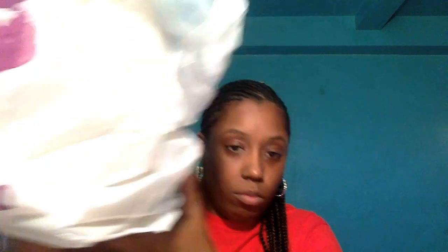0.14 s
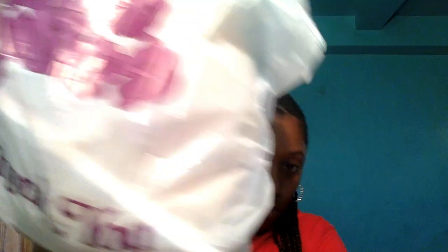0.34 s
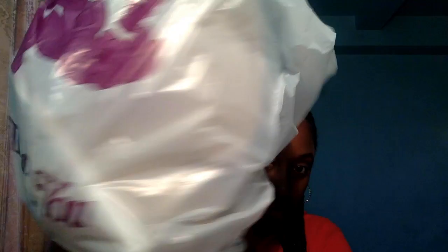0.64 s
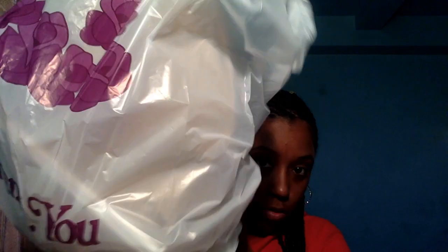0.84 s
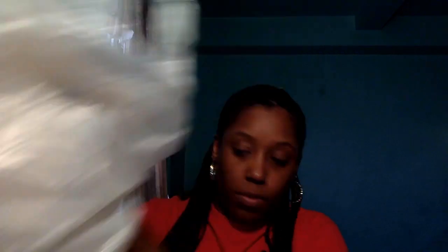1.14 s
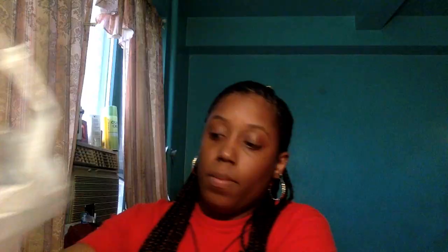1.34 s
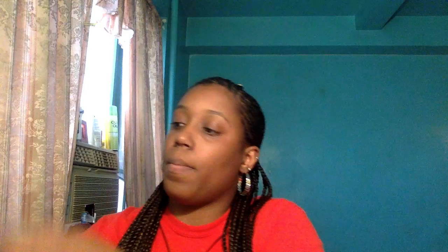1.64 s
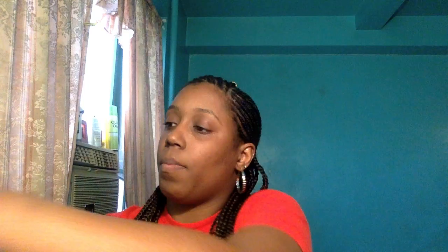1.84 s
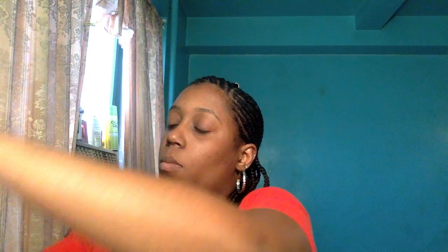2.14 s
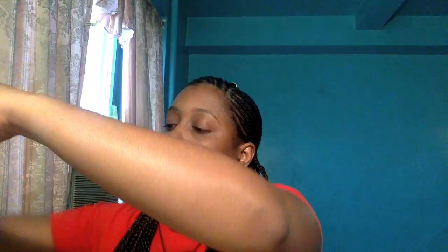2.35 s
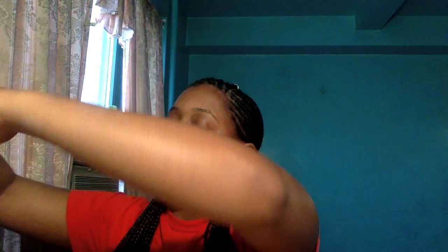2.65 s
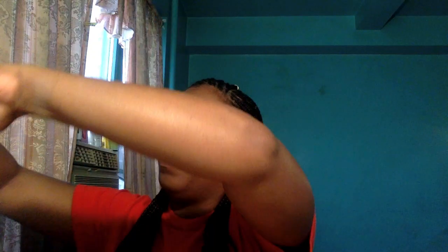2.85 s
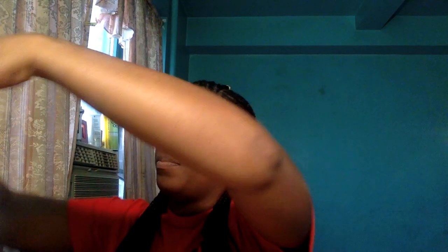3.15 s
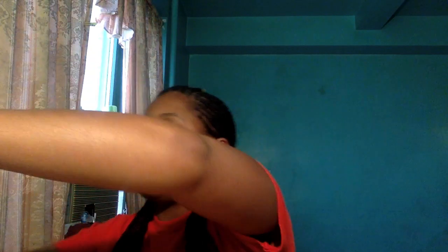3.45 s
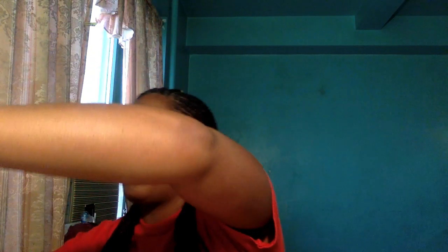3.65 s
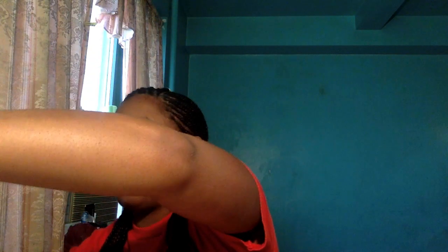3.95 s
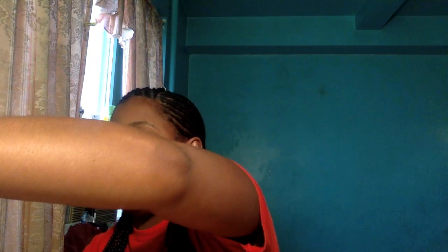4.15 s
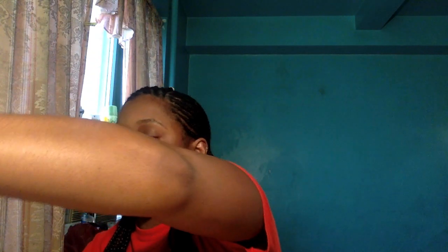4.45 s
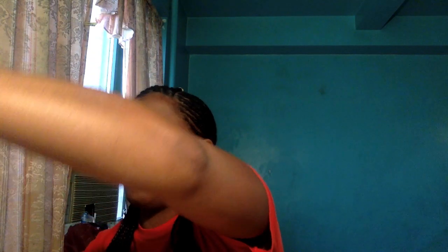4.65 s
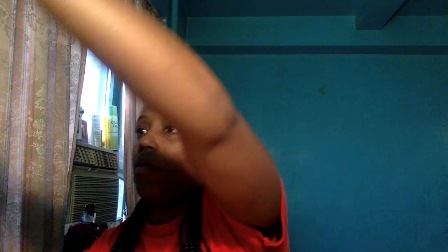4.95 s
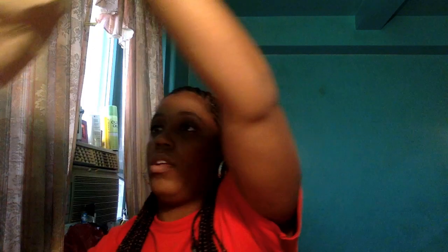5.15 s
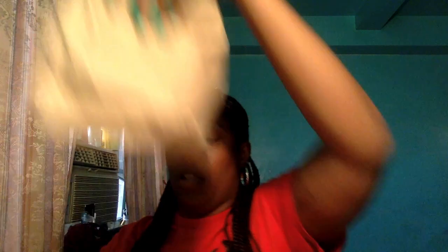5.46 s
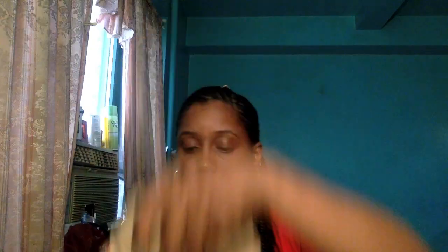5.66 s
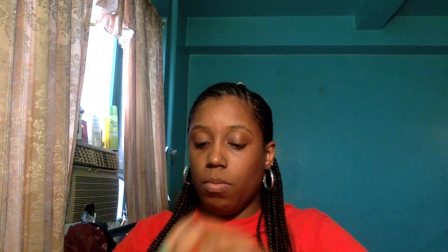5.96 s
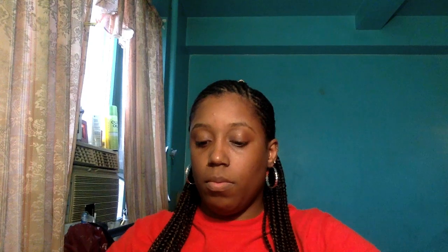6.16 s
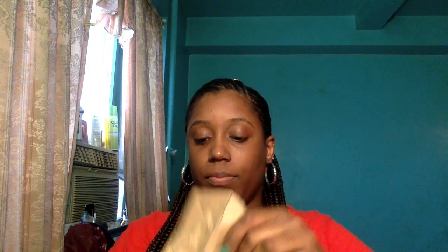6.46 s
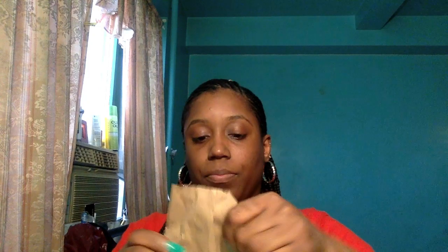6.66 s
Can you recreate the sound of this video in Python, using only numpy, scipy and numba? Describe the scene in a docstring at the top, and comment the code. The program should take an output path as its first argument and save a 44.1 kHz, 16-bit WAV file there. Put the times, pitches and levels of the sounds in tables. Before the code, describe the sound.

Hands rummage in a thin plastic carrier bag with sharp irregular crackles, pause briefly, then crumple a stiff paper bag close by in a small room.

```python
"""Rummaging in carrier and paper bags

Hands rummage in a thin plastic carrier bag and pull out a stiff paper bag, near a laptop in a small room.
Creases, folds and film crackle as many short decaying tones, clustered by a wandering grip; snaps, ticks,
pops and bumps come at listed times. Air in the bags booms, something small clinks twice, and two faint
hollow tones ring. A fan hums faintly as shaped noise. The microphone peaks at 3 kHz and dips near 7.5 kHz.
"""
import sys
import numpy as np
from scipy import signal
from scipy.fft import rfft, irfft
from scipy.io import wavfile
from numba import njit

SR = 44100
rng = np.random.default_rng(int(sys.argv[2]) if len(sys.argv) > 2 else 0)


def wrap_up_sound(samples):
    """Save the sound to the file named by the first command line argument, as 16-bit audio."""
    columns = np.atleast_2d(samples).T
    # keep every value between -1 and 1, then stretch to whole-number steps
    tamed = np.clip(columns, -1, 1)
    steps = np.round(tamed * 32767).astype(np.int16)
    wavfile.write(sys.argv[1], SR, steps)


N = 300762  # length in samples

# Levels below are starting values: the sound functions add fixed offsets, then come room and microphone.
# Faint fan noise, as it leaves the microphone: pitch_hz, level_db (per Hz, only the shape matters)
FAN_SPECTRUM = [(24, -65.5), (40, -35.5), (124, -8), (155, -17.5), (402, -17), (715, -27), (873, -21),
                (1300, -46), (2840, -28.5), (6020, -39.5), (16000, -46.5)]
FAN_RMS_DB = -63.5
# Each squeeze or pull of a bag: full_from_s, build_up_s, hold_s, crease_db, crease_pitch_hz,
# fold_db (relative to creases), fine_crackle_db (relative to creases)
SQUEEZES = [(.0, 0.018, 0.0075, -47, 3050, -8, 1), (0.077, 0.036, 0.014, -51.5, 2640, -4.5, 9),
            (0.191, 0.0087, 0.0049, -35, 2940, -16, 3), (0.303, 0.036, 0.016, -63, 2020, -20, -5),
            (0.49, 0.16, 0.032, -56.5, 3300, -0.5, -2), (0.633, 0.21, 0.19, -49, 3210, -18, 6.5),
            (0.751, 0.05, 0.032, -43.5, 2870, -13, 9), (0.797, 0.024, 0.018, -47, 2580, -5, -3),
            (0.88, .04, 0.041, -66, 2620, -7, 10), (0.957, 0.082, 0.029, -56.5, 2620, -1.5, 3),
            (1.03, .03, .02, -74, 3000, -8, 2), (1.077, 0.023, 0.078, -60, 3960, -17, 1),
            (1.28, 0.096, 0.061, -38, 2960, -5, 2), (1.455, 0.14, 0.1, -37, 2890, -5.5, 4.5),
            (1.625, 0.17, 0.032, -23.5, 3436, -4.5, 2.5), (1.83, 0.74, 0.098, -38.5, 2750, -8.5, -12),
            (1.909, 0.024, 0.042, -20.5, 3290, -8.5, -2.5), (2.045, 0.21, 0.04, -24, 2980, -6, -1),
            (2.144, 0.16, 0.2, -25.5, 3270, -7.5, 1), (2.389, 0.022, 0.011, -33, 3200, -11, -14),
            (2.473, 0.021, 0.058, -24.5, 3350, -5, 2.5), (2.551, .05, 0.086, -30, 2890, -9, -5.5),
            (2.746, 0.12, 0.026, -29.5, 2790, -4, -14), (2.776, 0.014, 0.21, -24.5, 3110, -5, 0.5),
            (3.085, .015, 0.008, -41.5, 3300, -3, -14), (3.132, 0.016, 0.07, -34.5, 3110, 0, -15),
            (3.251, 0.015, 0.032, -38.5, 2940, 4.5, -7), (3.344, 0.024, 0.073, -30, 2900, -8.5, -5),
            (3.414, 0.15, 0.11, -34.5, 2770, -1, -1), (3.565, 0.036, 0.057, -46.5, 4020, -16, 7),
            (3.628, 0.022, 0.015, -33.5, 2700, 0, -6), (3.71, 0.012, 0.096, -29, 2860, -5, -11.5),
            (3.84, .03, .02, -38.5, 3650, -5, -2.5), (3.923, 0.064, 0.063, -28, 2690, -2, -8.5),
            (4.065, 0.023, 0.12, -36, 2100, -2.5, -5.5), (4.175, 0.073, 0.07, -29.5, 2410, -3.5, -5.5),
            (4.26, 0.026, 0.048, -39.5, 2330, 1, 0.5), (4.326, 0.045, 0.027, -45.5, 2410, 1, -12),
            (4.4, 0.27, 0.12, -44.5, 3160, 1, -7.5), (4.581, 0.24, 0.05, -33.5, 2760, -2.5, -5),
            (4.59, 0.066, 0.48, -50.5, 2960, -14.5, 19), (4.643, 0.018, 0.018, -26, 3000, -2, 0.5),
            (4.739, 0.056, 0.086, -28.5, 2720, -4, 6), (4.872, 0.099, 0.13, -35.5, 3420, 2, 10),
            (5.032, .05, 0.09, -40, 3660, -5.5, 2), (5.173, .03, 0.22, -62.5, 2940, -1, -14),
            (5.355, 0.04, 0.03, -51, 2210, -8, -1.5), (5.428, 0.03, 0.069, -66, 3090, -15, 1.5),
            (5.725, 0.003, 0.0057, -37, 3230, -31, -8), (5.817, .012, 0.028, -43.5, 3570, -5, -22),
            (5.85, 0.016, 0.018, -18.5, 2965, -8, 3), (5.9, .02, 0.071, -38, 3180, -10, -1),
            (5.998, 0.1, 0.063, -33, 3630, -5.5, -3.5), (6.168, 0.13, 0.052, -21, 3570, -12, -1.5),
            (6.247, 0.099, 0.13, -25.5, 3340, -9.5, 0), (6.453, 0.23, 0.13, -21, 3430, -13.5, -1.5),
            (6.59, 0.032, 0.092, -32, 3790, -11, 0), (6.697, 0.033, .03, -34.5, 3440, -9.5, -15),
            (6.775, 0.075, 0.1, -19, 3490, -11, -1)]
# Bags settling between squeezes: crease_db, crease_pitch_hz, fold_db and fine_crackle_db (relative to creases)
BAGS_AT_REST = (-68.5, 3008.5, -6, -8.5)
# How much air booms in the bags: time_s, boom_db (relative to broad folds)
AIR_BOOM = [(0, 3), (1.2, -21), (1.4, -7.5), (1.6, -4.5), (2.3, -7), (2.6, -4.5), (2.9, -4), (3.1, -7.5),
            (4.3, -12.5), (4.9, -8), (5.3, -2.5), (5.7, -5.5), (6.0, -1.5), (6.82, 3.5)]
# Hollow tones of the air and the desk: pitch_hz, level_db, t60_s (time to fall by 60 dB)
HOLLOW_MODES = [(87.7, -5.5, 0.1), (126.4, -5, 0.18), (224, -3.5, 0.06), (291, 5.5, 0.032),
                (354, 0.5, 0.04), (541, -0.5, 0.051)]
# Crease snaps and film ticks, loud and faint: start_s, level_db, pitch_hz,
# tick_db (bright tick, relative to the snap)
CREASE_SNAPS = [(0.0151, -22, 2980, -24), (0.093, -35, 2530, 6), (0.177, -35, 2460, 4),
                (0.197, -17, 2980, -0.5), (0.205, -17.5, 5300, -7), (0.3075, -41, 2110, -20.0),
                (0.3168, -36, 2110, -18), (0.595, -29.5, 2220, -19.0), (0.6246, -31, 3660, -15),
                (0.6462, -31, 2740, 12.5), (0.685, -43, 2800, 23), (0.701, -43, 2780, 21),
                (0.7351, -31, 2580.0, 10), (0.7615, -29, 2600, 8), (0.7976, -15.5, 2870, -15.0),
                (0.822, -25.5, 2140, -12.0), (0.936, -35, 1860, -15), (0.97, -43.0, 2660, 12),
                (0.9867, -33.5, 6040.0, 7.5), (1.0403, -51, 4970.0, 17), (1.0926, -31.5, 4540, 8.5),
                (1.1352, -50, 4610.0, 14), (1.1851, -52.0, 3470.0, 10), (1.2245, -48, 2630.0, 11),
                (1.257, -29, 2580, 5), (1.278, -31.5, 2900, 10), (1.305, -14.5, 2730.0, -12),
                (1.3195, -20.5, 3160, -2), (1.328, -31.0, 2960, 6), (1.4092, -29, 2930.0, 6),
                (1.4496, -36.0, 3370.0, 7), (1.462, -24, 3200, -5.0), (1.511, -20, 1830, -10),
                (1.537, -18, 3080, -1), (1.6197, -13, 1560, -8.0), (1.6421, -9.5, 3180, -7.0),
                (1.817, -28, 3120, 1), (1.8248, -25, 3010.0, -5), (1.857, -21, 3000, -14.0),
                (1.887, -21, 3480.0, -32.0), (1.8965, -16.5, 1560.0, -12), (1.9133, -10, 2880, 6),
                (1.933, -7, 2710, 7.5), (1.949, -14, 3160, 3), (1.994, -17.5, 1790, 6),
                (2.032, -19, 2360.0, -8), (2.0674, -9.5, 3030, -2.5), (2.076, -10.5, 2460, -2),
                (2.112, -13.5, 2580, 0), (2.1233, -13, 3350, 0), (2.1472, -11, 4830, -15),
                (2.158, -11.5, 3060, 1.5), (2.1725, -9, 2260, -15), (2.1882, -8.5, 4100, -2),
                (2.2012, -19, 2830.0, 15), (2.2232, -6, 4830, -3), (2.234, -10.5, 2830.0, -1),
                (2.2795, -6.5, 3470, -2), (2.3176, -8.5, 3660, 2.5), (2.357, -13.5, 2700, -20),
                (2.464, -14, 3130.0, -16), (2.4716, -25, 2930.0, -5.0), (2.4804, -4, 3260, -3),
                (2.5092, -13, 2600, 7), (2.5145, -5, 3000, -5), (2.569, 0, 2860, -3.5),
                (2.5754, -25, 3370.0, 3), (2.6385, -8.5, 2980, -28), (2.6494, -6, 4000, -7),
                (2.659, -31, 5060.0, 1), (2.696, -19, 3180, -31), (2.7316, -14.5, 3380, -23.0),
                (2.7655, -4, 2640, -2.5), (2.7715, -5.5, 2970, -5), (2.8, -6, 3340, -3),
                (2.814, -9, 2920, 2), (2.829, -10.5, 3300, 2), (2.839, -6, 3660, -4.0),
                (2.884, -12.0, 4520, -4), (2.897, -15, 2880, -9.5), (2.909, -15, 2610, 7),
                (2.9371, -3, 3560, -19.0), (2.9455, -7, 3500, -1), (2.9807, -19, 3300, -12),
                (3.0078, -11.5, 3180, -1), (3.016, -28.5, 3060, 15), (3.0878, -29, 3710.0, -23),
                (3.1065, -17.5, 2840, -28.0), (3.142, -15.5, 4250, -13), (3.157, -12, 3270, -8.5),
                (3.178, -21.0, 3440, -19), (3.204, -17, 2900, -33.0), (3.246, -19, 2700, -24.0),
                (3.2504, -14.5, 2700, -3.5), (3.2683, -21.0, 3510.0, -15), (3.278, -14.5, 3350, -7),
                (3.2963, -22, 2680.0, -20.0), (3.3354, -13.5, 3280, -12.0), (3.346, -15, 2220, -18),
                (3.3719, -8, 2740, -3.5), (3.3937, -12, 3240, -4), (3.4466, -15.5, 2800, -11),
                (3.4746, -31, 3430.0, -8.0), (3.4902, -12, 3570, 2), (3.5132, -14, 3670, -9),
                (3.5644, -21, 3550, -2), (3.5769, -12.5, 4800, -2), (3.5994, -24, 1800, 15),
                (3.616, -32.5, 3000, 20), (3.632, -36, 3040, 17), (3.644, -14.5, 3340, -0.5),
                (3.7126, -13.5, 1790, -7), (3.7197, -11, 2810.0, -6), (3.74, -8, 2750, -11),
                (3.764, -25, 1160, 11), (3.77, -14, 2290.0, -12), (3.7806, -20, 3700, -8),
                (3.795, -10, 3050, -4), (3.8037, -15, 3140, -1), (3.82, -11.5, 2940, -2),
                (3.8492, -8.5, 3440, -11), (3.859, -26, 3800, -11), (3.8809, -23, 1360, -20.0),
                (3.9096, -28, 1420, -21.0), (3.9193, -10.5, 2240, -11), (3.9397, -7.5, 2160, -6.5),
                (3.9884, -12, 2840, -4.5), (4.044, -30.0, 2330.0, -22.0), (4.0556, -20.5, 1940, -5),
                (4.0824, -15, 2300, -13), (4.0943, -12, 1800, -9), (4.122, -24, 2070, -22.0),
                (4.146, -16.5, 1780, -9), (4.152, -16.5, 1630, -13), (4.2166, -10.0, 1470, 0.5),
                (4.226, -15, 3460, -11), (4.239, -19, 1820, -9), (4.3306, -24.5, 2350, -24),
                (4.4155, -28.5, 1370, -26), (4.4582, -28.5, 1410.0, -20), (4.5018, -25, 1350, -4.5),
                (4.5194, -19.5, 3570.0, -6), (4.5709, -16, 1500, -18.5), (4.6226, -22, 3320, -9.5),
                (4.6434, -9, 3170, -8), (4.6561, -16, 3300, -6.5), (4.672, -21, 4340.0, 7),
                (4.692, -21.5, 1820, -2), (4.7209, -17.5, 1360, -8.0), (4.732, -15.5, 3360.0, -12.5),
                (4.741, -16.5, 1950, -11), (4.753, -13, 2320, 1.5), (4.781, -7.5, 3170.0, 4.5),
                (4.8043, -18.5, 2300, -2.5), (4.8177, -10.5, 2870, -19.5), (4.879, -14, 1730, -14),
                (4.947, -16.5, 4870, 2), (4.992, -32, 3000, 19), (5.0008, -19.5, 1720, -1.5),
                (5.036, -13, 4530, -1.5), (5.075, -17, 3700, -1.5), (5.2517, -36, 5100, -20),
                (5.353, -29, 2040, -22), (5.6978, -37, 4420, 7), (5.7293, -25, 1920, 0),
                (5.738, -38, 2420, 3), (5.8084, -31, 3900, -9.0), (5.827, -26, 1720, -37.0),
                (5.855, -12, 2220.0, 2), (5.8661, -10, 2270, -6), (5.875, -12.5, 1810, -11),
                (5.9785, -30, 4260.0, 5), (6.0045, -9, 4360, 1), (6.0307, -17.5, 1760, -30),
                (6.05, -13, 2750, -7), (6.1108, -13, 3100, -11), (6.129, -12.5, 2420, 4),
                (6.1381, -31, 4450.0, 0), (6.1712, -12, 2920, 0), (6.1806, -7, 4500, 0.5),
                (6.207, -6, 4770, 2), (6.2133, -18, 3290.0, 5.0), (6.247, -20, 2990.0, -2),
                (6.2603, -26.5, 2570, 19.5), (6.2749, -14, 4000, -1), (6.289, -14, 1750, 7.5),
                (6.303, -12, 3500, 2), (6.3275, -8.5, 3670, -16), (6.3383, -10.5, 2570.0, 1.5),
                (6.3782, -6, 3350, -12), (6.3906, -10, 2300, -18.0), (6.4123, -9.5, 3970, 3.5),
                (6.4175, -11, 3310.0, -6), (6.4986, -9, 2470, 6), (6.5313, -17, 2460, 1),
                (6.541, -15, 2600, 7), (6.5738, -15, 2220.0, -11), (6.593, -12.5, 3780, -8),
                (6.603, -10, 4120, -10), (6.6343, -11, 3940, -18.0), (6.6484, -11, 3130, 3),
                (6.6642, -7.5, 4000, -8), (6.7092, -18.5, 3130.0, -27.0), (6.7252, -35, 4910.0, 3.0),
                (6.7409, -11, 4310.0, -11), (6.7503, -17, 3510.0, -2), (6.764, -7.5, 3530, -16.0),
                (6.783, 4, 3830, -10), (6.798, 1, 4360, -1.5)]
# Two faint hollow rings: start_s, level_db, pitch_hz, t60_s
HOLLOW_RINGS = [(.018, -56, 502, 0.14), (.058, -46.5, 487, 0.084)]
# A small hard object clinks: start_s, level_db
CLINKS = [(0.4425, -42.5), (0.506, -39)]
# Tones of that object: pitch_hz, level_db, t60_s
CLINK_MODES = [(973, 3, 0.019), (3230, -11, 0.055), (8240, -3.5, 0.06)]
# Broad folds that pop over: start_s, level_db
FOLD_POPS = [(0.494, -32), (1.305, -20), (1.477, -30), (1.51, -20), (1.615, -14), (1.896, -31), (1.91, -23),
             (1.924, -14), (2.031, -27), (2.123, -23), (2.168, -25), (2.397, -19), (2.43, -28),
             (2.471, -30), (2.479, -8), (2.513, -20), (2.568, -15), (2.637, -18), (2.936, -13), (2.98, -9),
             (3.132, -23), (3.168, -26), (3.373, -21), (3.491, -19), (3.553, -19), (3.622, -28),
             (3.712, -10.5), (3.737, -12), (3.793, -14), (3.879, -28), (3.909, -31), (3.944, -14),
             (4.063, -25), (4.093, -17), (4.145, -29), (4.217, -23), (4.547, -19.5), (4.572, -40.5),
             (4.642, -13.5), (4.721, -26), (4.738, -15), (4.877, -23.5), (4.92, -15), (4.972, -26),
             (5.827, -48), (5.843, -16), (5.856, -17), (6.005, -27), (6.373, -22), (6.516, -17),
             (6.762, -26), (6.781, -19)]
# The bags bump the desk or pop hollow: start_s, level_db, pitch_hz
BUMPS = [(1.564, -37, 296), (1.615, -21, 120), (1.926, -27, 306), (2.054, -31.5, 300), (2.222, -40, 273),
         (2.269, -31, 308), (2.474, -36, 423), (2.563, -43, 392), (2.758, -38, 380), (3.14, -38, 543),
         (3.26, -38, 555), (4.63, -41, 498), (4.758, -34.5, 383), (4.915, -28.5, 154.5), (5.844, -29, 336),
         (5.862, -22, 360), (5.882, -27.5, 368), (6.175, -37, 443), (6.371, -29, 374), (6.423, -36, 390),
         (6.647, -34.5, 315)]
# Echoes of the room in bands: band_hz, t60_s, level_db (relative to direct sound)
ROOM_BANDS = [(305, 0.27, -9.5), (1340, 0.43, -10.5), (4560, 0.19, -11), (11000, 0.098, -6)]
# Tone colour of the microphone: pitch_hz, level_db
MICROPHONE = [(30, -46.5), (70, -17.5), (150, -9.5), (380, -2), (650, -1.5), (1000, -1), (2000, -0.5),
              (3000, 1.5), (4500, 0.5), (6300, -1), (7400, -10.5), (8800, -7.5), (11000, -3.5), (15500, 1)]

PAPER_FROM_S = 5.6  # the paper bag takes over; its patch sizes scatter more widely
SHAPE_HOLD_S = 0.04  # how long the wall keeps one shape
PANEL_OCTAVES, PANEL_PULL = 0.45, 0.7  # pitch step between panels; pull towards them, 0 to 1
BUILD_DB = 34.5  # a squeeze rises by this much during its build-up time
LET_GO_DB_S, FILM_LET_GO_DB_S = 330, 442.5  # how fast paper and film first fall, dB per second
SETTLE_DB, SETTLE_DB_S = 24, 71.5  # later slow fade: starts this many dB down, then dB per second
TOP_HZ = 15800  # the treble is cut above this


def undb(db):
    """Turn decibels into an amplitude factor."""
    return 10 ** (np.asarray(db) / 20)


@njit
def rings(at, hz, t60, size, turn, rise, n, sr):
    """Each row starts a damped sine at its own time, pitch and phase; rise sets its swell, in cycles."""
    out = np.zeros(n)
    for k in range(len(at)):
        step = np.exp(2j * np.pi * hz[k] / sr - np.log(1000) / (t60[k] * sr))
        lack_step, lack = np.exp(-hz[k] / (rise * sr)), 1.
        z = size[k] * np.exp(2j * np.pi * turn[k])
        first = int(at[k] * sr)
        for j in range(first, min(n, first + int(t60[k] * sr))):
            out[j] += z.imag * (1 - lack) ** 2
            z, lack = z * step, lack * lack_step
    return out


def ring(at, hz, t60, db, turn, rise):
    """Damped sines from arrays that fit one common shape; turn is the starting phase as a share of a cycle."""
    columns = np.broadcast_arrays(at, np.clip(hz, 20, SR / 2.2), t60, undb(db), turn)
    rows = [np.ravel(c) * 1. for c in columns]
    return rings(*rows, max(rise, .01), N, 1. * SR)


def colour(x, points):
    """Filter through (Hz, dB) points without sounding early, using the folded cepstrum."""
    hz, db = np.transpose(points)
    log_grid = np.log(np.linspace(1, SR / 2, 2049))
    cepstrum = irfft(np.interp(log_grid, np.log(hz), db) * np.log(10) / 20)
    # folding the second half onto the first makes the filter causal
    cepstrum[1:2048] *= 2
    cepstrum[2049:] = 0
    return signal.fftconvolve(x, irfft(np.exp(rfft(cepstrum))))[:N]


def fan():
    """Faint steady air noise with a hum: random noise shaped by the fan's spectrum."""
    air = colour(rng.standard_normal(N), FAN_SPECTRUM)
    return undb(FAN_RMS_DB) * air / np.std(air)


def slips(every_s):
    """The grip wanders to a new random value at this pace, in straight lines."""
    return np.interp(np.arange(N) / SR / every_s, np.arange(4000), rng.standard_normal(4000))


def handling(let_go_db_s):
    """How much each squeeze sounds over time (power, one row each): build-up, hold, let go; last row is rest."""
    t = np.arange(0, N, 64) / SR
    s, build, hold, db = np.transpose(SQUEEZES)[:4, :, None]
    after = np.clip(t - s - hold, 0, None)
    # a fast fall first, then the walls settle on slowly
    fade = np.minimum(let_go_db_s * after, SETTLE_DB + SETTLE_DB_S * after)
    under = BUILD_DB * np.clip(s - t, 0, None) / build + fade
    rest = np.full(len(t), BAGS_AT_REST[0])
    return t, undb(2 * np.vstack([db - under, rest]))


def layers():
    """Levels of creases, folds and film (dB) and crease pitch per sample, from the power of all squeezes."""
    hz, fold_db, fine_db = np.vstack([np.array(SQUEEZES)[:, 4:], BAGS_AT_REST[1:]]).T
    t, paper = handling(LET_GO_DB_S)
    _, film = handling(FILM_LET_GO_DB_S)
    powers = (paper.sum(0), undb(2 * fold_db) @ paper, undb(2 * fine_db) @ film)
    rows = [10 * np.log10(p) for p in powers]
    rows.append(hz @ paper / paper.sum(0))  # louder squeezes weigh more in the pitch
    return [np.interp(np.arange(N) / SR, t, row) for row in rows]


def buckles(level_db, grip, scatter_db, cluster_db, count):
    """Many small buckles at random times: a few are much larger, and they cluster as the grip slips."""
    when, pitch, turn, chance = rng.random((count, 4)).T
    at = when * N / SR
    where = (when * N).astype(int)
    db = -scatter_db * np.log(1 - chance) + cluster_db * grip[where]
    # bring the summed power per second to 0 dB before the wanted level is added
    db = db - 10 * np.log10(np.sum(undb(2 * db)) / (N / SR))
    return at, db + level_db[where], pitch, turn


def crackle(column_db, grip, centre_hz, octaves, cycles, scatter_db, cluster_db, count):
    """Each buckle rings a patch of wall for a few cycles; sizes scatter, with like energy at any pitch."""
    at, db, pitch, turn = buckles(column_db, grip, scatter_db, cluster_db, count=count)
    where = (at * SR).astype(int)
    spread = np.broadcast_to(octaves, N)[where] * np.log(pitch / (1 - pitch))
    wanted = np.log2(centre_hz[where]) + spread
    # for a moment the wall keeps its shape, so pitches are drawn towards the same few panels
    shape = rng.random(1000)[(at / SHAPE_HOLD_S).astype(int)]
    panel = (np.round(wanted / PANEL_OCTAVES - shape) + shape) * PANEL_OCTAVES
    has_panels = centre_hz[where] < 7000  # the fine film crackle has none
    hz = 2 ** (wanted + PANEL_PULL * (panel - wanted) * has_panels)
    hz = np.clip(hz, 300, 18000)
    return ring(at, hz, cycles / hz, db + 10 * np.log10(hz), turn, 0.66)


def boom(fold_db, grip):
    """Air inside the bags booms when they are pressed: buckles ring the hollow modes, slightly detuned."""
    air_db = fold_db + np.interp(np.arange(N) / SR, *np.transpose(AIR_BOOM)) + 28
    at, db, pitch, turn = buckles(air_db, grip + slips(.02), 1.5, 2.5, count=3500)
    mode = (pitch * len(HOLLOW_MODES)).astype(int)
    hz, mode_db, t60 = np.array(HOLLOW_MODES)[mode].T
    detune = 1 + 0.14 * (2 * rng.random(len(at)) - 1)
    return ring(at, hz * detune, t60, db + mode_db, turn, 0.066)


def rustle():
    """Creases and broad folds of the bag wall, fine crackle of the film and the boom of the air inside."""
    crease_db, fold_db, fine_db, crease_hz = layers()
    grip = slips(.008)
    # the hand keeps finding larger and smaller patches, so the colour shifts
    patch_hz = crease_hz * 2 ** (0.15 * slips(.025))
    crease_octaves = np.where(np.arange(N) < PAPER_FROM_S * SR, 0.27, 0.36)
    crease_grip = grip + 0.74 * slips(0.0061)
    creases = crackle(crease_db + 0.83, crease_grip, patch_hz, crease_octaves,
                      cycles=21.7, scatter_db=0.68, cluster_db=0.79, count=12000)
    fold_grip = grip + 0.15 * slips(0.0046)
    fold_hz = 1080 * 2 ** (0.27 * slips(.03))
    folds = crackle(fold_db + 4.0, fold_grip, fold_hz, 0.2274,
                    cycles=16.35, scatter_db=0.41, cluster_db=2.7, count=9000)
    film_grip = .6 * grip + .6 * slips(.006)
    film_hz = 12500 * 2 ** (0.2 * slips(0.018))
    fine = crackle(fine_db + 8.5, film_grip, film_hz, 0.28,
                   cycles=10.56, scatter_db=3.3, cluster_db=2.2, count=40000)
    return creases + folds + fine + boom(fold_db, grip)


def snaps():
    """A crease flips over: one panel rings out and a few neighbours chatter after it for some ms."""
    s, db, hz, _ = np.transpose(CREASE_SNAPS)[:, :, None]
    late, pitch, turn = rng.random((len(CREASE_SNAPS), 3, 12)).transpose(1, 0, 2)
    main = ring(s, hz, 22.2 / hz, db + 0.27, turn[:, :1], 0.88)
    spread = np.tile(2 * pitch[:, :6] - 1, 2)  # six neighbours, each struck twice
    near_hz = hz * np.where(spread > 0, 2.1, 2.7) ** spread
    near_t60 = 20.3 / np.sqrt(hz * near_hz)
    near_db = db - 6.5 - 6.4 * np.abs(spread)  # weaker when further off in pitch
    return main + ring(s + .0032 * late ** 1.5, near_hz, near_t60, near_db, turn, 0.93)


def ticks():
    """With each snap a tiny fold of film lets go: sharp bright clicks within 5 ms, weaker as they come later."""
    s, db, _, tick_db = np.transpose(CREASE_SNAPS)[:, :, None]
    late, pitch, turn = rng.random((len(CREASE_SNAPS), 3, 12)).transpose(1, 0, 2)
    late = late ** 2  # most clicks come early
    return ring(s + 0.005 * late, 7000 + 9500 * pitch, 0.0039, db + tick_db - 1.0 - 4 * late, turn, 1.64)


def hoots():
    """Short soft hollow tones that swell and fade."""
    s, db, hz, t60 = np.transpose(HOLLOW_RINGS)
    return ring(s, hz, t60, db + 11.5, 0, 3.6)


def clinks():
    """A small hard object chatters for up to 18 ms, later strikes weaker; its modes ring slightly off pitch."""
    s, db = np.transpose(CLINKS)[:, :, None, None]
    hz, mode_db, t60 = np.transpose(CLINK_MODES)[:, None, :, None]
    late, turn, detune = rng.random((3, len(CLINKS), len(CLINK_MODES), 8))
    at = s + .018 * late
    detune_hz = 260 * (detune - .5)
    return ring(at, hz + detune_hz, t60, db + mode_db + 3.5 - 6 * late, turn, 1.9)


def pops():
    """A broad fold flips over: a short dull knock near 1 kHz, a little different each time."""
    s, db = np.transpose(FOLD_POPS)[:, :, None]
    late, pitch, turn = rng.random((len(FOLD_POPS), 3, 4)).transpose(1, 0, 2)
    hz = 1070 * 1.35 ** (2 * pitch - 1)
    return ring(s + .0015 * late, hz, 9.4 / hz, db + 1.5, turn, 0.7)


def bumps():
    """Dull thuds, each a low damped tone with a softer rebound 22 ms later."""
    s, db, hz = np.transpose(BUMPS)[:, :, None]
    at = s + np.array([0, .022])
    return ring(at, hz * np.array([1, 1.07]), 13.0 / hz, db + np.array([9, 4]), 0, 0.064)


def tail():
    """One set of diffuse echoes of near walls: fading noise in bands, the highest band dying first."""
    t, out = np.arange(SR // 2) / SR, 0
    centres = np.array(ROOM_BANDS)[:, 0]
    edges = np.sqrt(centres[1:] * centres[:-1])
    for (_, t60, db), low, high in zip(ROOM_BANDS, [20, *edges], [*edges, SR / 2.1]):
        band_filter = signal.butter(2, [low, high], "band", fs=SR, output="sos")
        band = signal.sosfilt(band_filter, rng.standard_normal(len(t)))
        fade = 1000. ** (-t / t60) * np.clip(t / 0.0032, 0, 1)
        out = out + undb(db) * band * fade / np.sqrt(np.sum(fade ** 2))
    return out


def room(x, count=8):
    """The bags keep moving, so the sound passes smoothly from one set of echoes to the next."""
    place = np.arange(N) / SR / .12  # one step each 0.12 s
    echoes = np.zeros(N)
    for k in range(count):
        away = np.abs((place - k + count / 2) % count - count / 2)
        share = np.cos(np.pi / 2 * np.clip(away, 0, 1))
        echoes += signal.fftconvolve(x * share, tail())[:N]
    return echoes


def scene():
    """Bags, bumps and clinks sound in the room and pass the microphone; the fan is added after it."""
    bags = rustle() + snaps() + ticks() + hoots() + clinks() + pops() + bumps()
    # the fan's spectrum is given as it leaves the microphone
    return (colour(bags + room(bags), MICROPHONE) + fan())[None]


def record(dry):
    """Anything beyond full scale is clipped flat, then a steep filter cuts the top."""
    top_cut = signal.ellip(10, .2, 70, TOP_HZ, fs=SR, output="sos")
    return signal.sosfilt(top_cut, np.clip(dry, -1, 1))


dry = scene()
out = record(dry)
wrap_up_sound(out)
```